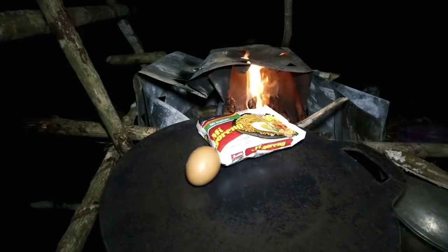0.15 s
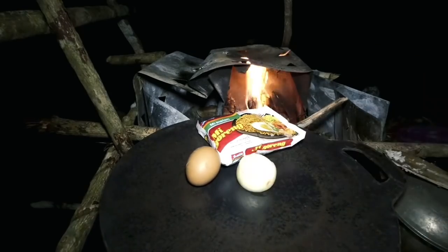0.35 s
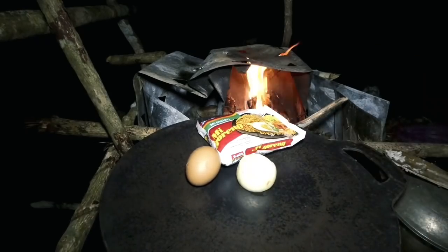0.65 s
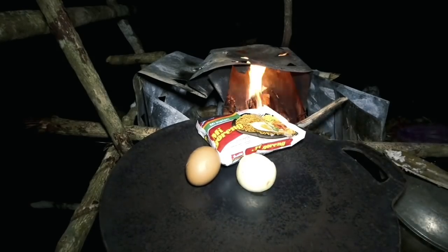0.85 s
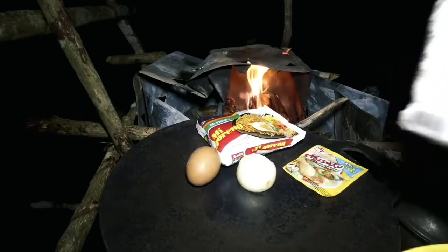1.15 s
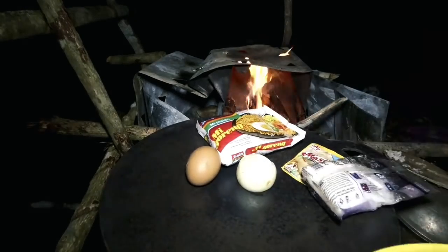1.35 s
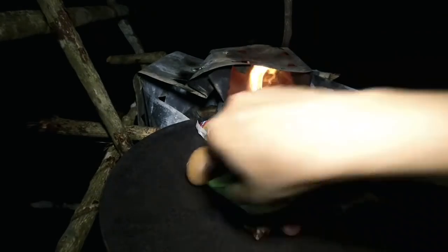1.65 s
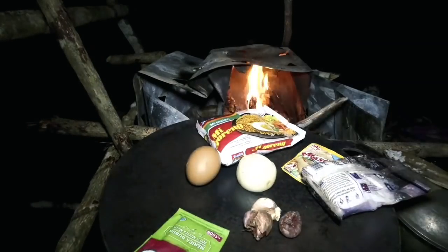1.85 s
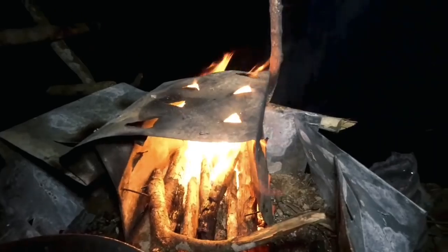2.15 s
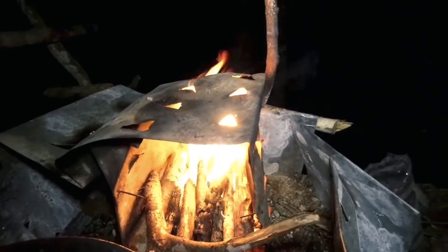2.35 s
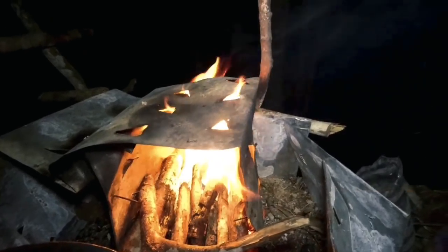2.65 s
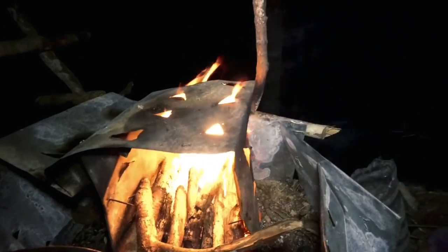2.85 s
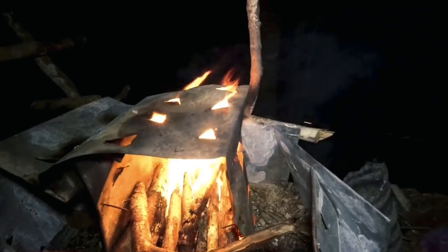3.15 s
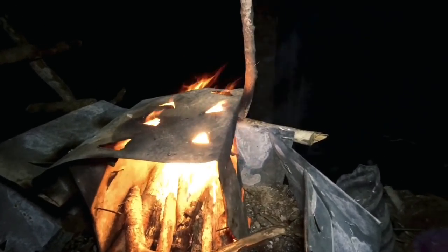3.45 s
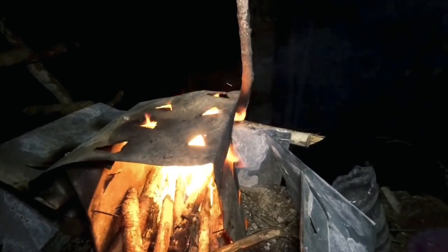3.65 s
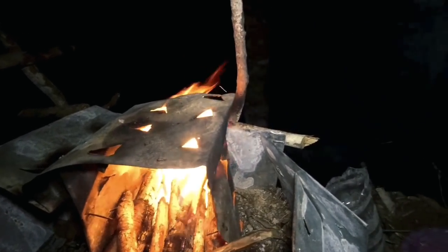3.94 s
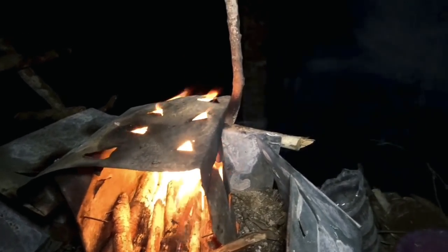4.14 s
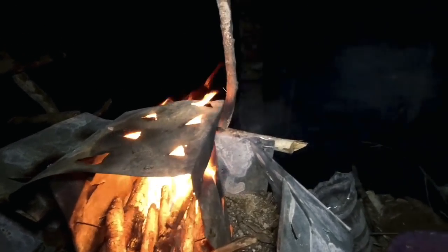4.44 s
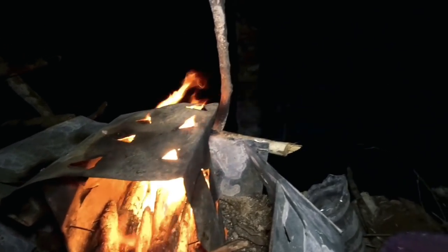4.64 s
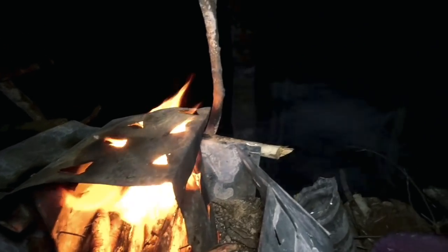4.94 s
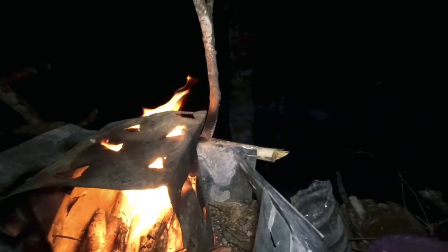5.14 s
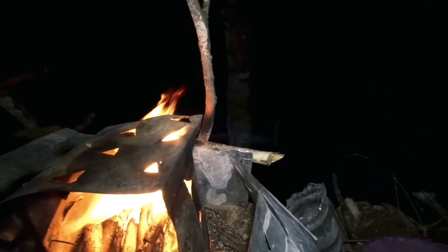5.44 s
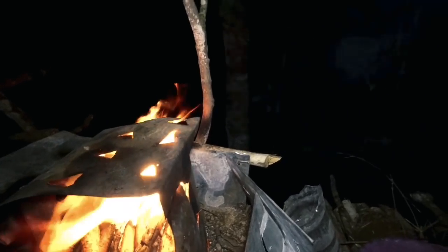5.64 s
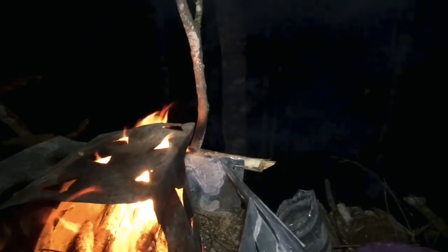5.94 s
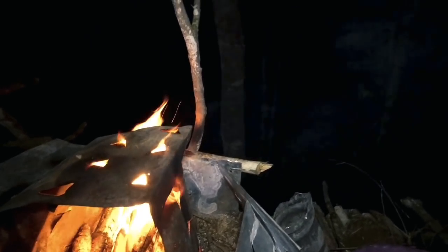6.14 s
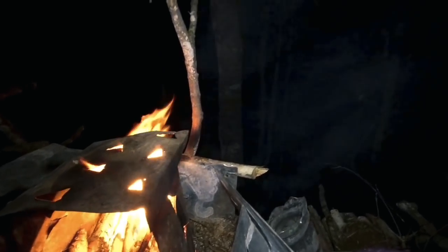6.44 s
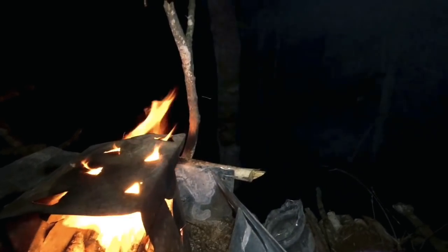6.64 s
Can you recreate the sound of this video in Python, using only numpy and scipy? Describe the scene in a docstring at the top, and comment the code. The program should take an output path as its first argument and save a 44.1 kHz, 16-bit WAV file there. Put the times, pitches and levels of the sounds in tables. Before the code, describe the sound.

A wide stereo night forest: a steady, shrill insect buzz near 5 kHz over fine hiss, with faint cricket trills, quacking frogs and tiny peeps. The fire is almost inaudible. At about two seconds it cuts abruptly and fades quickly into a close mono view, where low flame flutter, draught rumble, soft flaps and a small crack join the continuing insects, with sharp katydid ticks near the end.

```python
"""A night forest beside a small wood fire, heard in stereo from a step back, then in mono close by.
Buzzing insects are combs of tones near 5 kHz, over a flickering, patchy hiss of filtered noise.
Crickets are pulsed tones, frogs pulse trains or rising notes, and katydids ringing noise near 10 kHz.
The fire is random puffs, a low rumble, single flaps and cracks.
The first view stops short at 2.121 s and the close one fades in."""
import sys
import numpy as np
from scipy import signal
from scipy.fft import rfft, irfft, next_fast_len
from scipy.io import wavfile
from scipy.ndimage import uniform_filter1d, map_coordinates

SR = 44100
rng = np.random.default_rng(int(sys.argv[2]) if len(sys.argv) > 2 else 0)


def materialize(psi):
    """Save the field psi as 16-bit PCM at rate SR to the path in sys.argv[1].

    A 1-D psi becomes a single channel; in a 2-D psi each row is a channel.
    """
    bounded = np.clip(np.atleast_2d(psi).T, -1, 1)
    quanta = np.round(bounded * 32767).astype(np.int16)
    wavfile.write(sys.argv[1], SR, quanta)


N = 299439
T = np.arange(N) / SR  # time of every sample, in seconds

# Wing strokes of the buzzers, back from the fire and close to it: [time_s, strokes_per_s]
STROKE_RATE_BACK = [(0, 103.17), (1.4, 103.32), (2.1, 103.15)]
STROKE_RATE_CLOSE = [(2.2, 103.4), (2.7, 103.55), (3.2, 103.7), (3.8, 103.65), (4.4, 103.8), (5.2, 103.75),
                     (5.9, 103.45), (6.8, 103.5)]
# Base level of the buzzing, back from the fire: [time_s, level_db]
BUZZ_LEVEL_BACK = [(0, -37), (.3, -37.5), (.6, -35.5), (1.02, -38), (1.42, -36), (2.1, -35.5)]
# Base levels of the forest hiss and of the finer, higher hiss: [back_db, close_db]
AIR_LEVEL = [-54.5, -47]
FIZZ_LEVEL = [-62.5, -52.5]
# Strength of the flames, for both flutter and draught: [time_s, level_db]
FLAME_STRENGTH = [(0, -71.5), (2.1, -68.5), (2.2, -44.5), (2.62, -56), (3.02, -52), (3.35, -46), (3.7, -48),
                  (4.2, -44.5), (4.95, -51.5), (6.8, -54.5)]


def amp(db):
    """Turns decibels into a gain."""
    return 10 ** (np.asarray(db) / 20)


def unit(x):
    """Scales a sound to an rms of 1."""
    return x / np.sqrt(np.mean(x ** 2) + 1e-20)


def curve(rows):
    """Draws straight lines between the points of a time table, sample by sample."""
    rows = np.asarray(rows)
    return np.interp(T, rows[:, 0], rows[:, 1])


def gain_at(points, hz):
    """Reads the gain of a spectrum table between its points, on a log-frequency axis."""
    f, db = np.transpose(points)
    return amp(np.interp(np.log(hz + 1), np.log(f + 1), db))


def colour(x, points):
    """Filters a sound by a spectrum table."""
    size = next_fast_len(len(x))
    gain = gain_at(points, np.fft.rfftfreq(size, 1 / SR))
    return irfft(rfft(x, size) * gain, size)[:len(x)]


def wander(rate):
    """Smooth chance, rms near 1, with about `rate` new values a second."""
    knots = rng.standard_normal(4096)
    # smooth curve at every 64th sample, straight lines in between
    coarse = map_coordinates(knots, [np.arange(N // 64 + 2) * 64 / SR * rate], mode="wrap")
    steps = np.diff(coarse)[:, None] * np.arange(64) / 64
    return (coarse[:-1, None] + steps).ravel()[:N]


def resonate(x, hz, width):
    """A steep resonance: the same two poles applied twice."""
    r = np.exp(-np.pi * width / SR)
    b, a = [1 - r, 0, r - 1], [1, -2 * r * np.cos(2 * np.pi * hz / SR), r * r]
    return signal.lfilter(b, a, signal.lfilter(b, a, x))


def add(mix, s, sound):
    """Adds a sound to the mix at time s, cutting what falls outside."""
    start = round(s * SR)
    sound = sound[max(-start, 0):]
    part = mix[max(start, 0):][:len(sound)]
    part += sound[:len(part)]


def swell(length):
    """Time axis and rounded envelope of one call."""
    t = np.arange(int(max(length, .005) * SR)) / SR
    return t, np.sqrt(abs(np.sin(np.pi * t / t[-1])))


def run_of(start, calls, gap, slowing=0):
    """Times of a run of calls whose gaps lengthen steadily."""
    k = np.arange(round(calls))
    return start + gap * k + slowing * k * (k - 1) / 2


def forest(x, t60):
    """Scattered echoes from the trunks, dying by 60 dB in t60 seconds, total energy 1."""
    t = np.arange(SR // 2) / SR
    hits = rng.random(len(t)) < 2000 / SR  # about 2000 echoes a second
    taps = rng.standard_normal(len(t)) * hits * amp(-60 * t / t60)
    return signal.oaconvolve(x, taps / np.linalg.norm(taps))[:len(x)]


def wash(points, db, flicker_db, patchy_db):
    """A broad, flickering insect hiss with random soft and loud patches in pitch and time."""
    hz, t, z = signal.stft(rng.standard_normal(N), SR, nperseg=1024)
    patches = rng.standard_normal((len(t), len(hz))).T
    patches = uniform_filter1d(patches, size=4, axis=0)  # spread over pitch
    patches = unit(uniform_filter1d(patches, size=6, axis=1))  # spread over time
    z = z * gain_at(points, hz)[:, None] * amp(patchy_db * patches)
    hiss = signal.istft(z, SR, nperseg=1024)[1][:N]
    return amp(db) * unit(hiss * amp(flicker_db * wander(60)))


def buzzer(strokes, points, jitter, count=30):
    """Wing strokes ring near 5 kHz: a comb of tones at multiples of the stroke rate."""
    turns = np.cumsum(strokes * (1 + jitter * wander(25))) / SR
    order = np.arange(39, 39 + count)  # multiples that fall in the buzzing range
    lines = np.zeros(1025, complex)
    phases = np.exp(2j * np.pi * rng.random(count))
    lines[order] = gain_at(points, order * np.mean(strokes)) * phases
    stroke = irfft(lines)  # the waveform of one wing stroke
    return unit(np.interp(turns % 1, np.arange(len(stroke)) / len(stroke), stroke))


def crowd(points, others_db, blur_db, count=3):
    """A few farther buzzers at their own rates, swelling by turns, and the blur of all the rest."""
    swells = np.array([amp(2.6 * wander(3.02)) for _ in range(count)])
    swells /= np.linalg.norm(swells, axis=0)  # one rises as another sinks
    others = np.zeros(N)
    for share, rate in zip(swells, rng.uniform(101, 108, count)):
        strokes = rate * (1 + .001 * wander(1.5))
        others += share * buzzer(strokes, points, 0.000843)
    blur = unit(colour(rng.standard_normal(N), points))
    return amp(others_db) * others + amp(blur_db) * blur


def surround_back():
    """The insects all around, back from the fire; each call makes a fresh random version."""
    # spectrum of the farther buzzers: [pitch_hz, level_db]
    far_buzz = [(4000, -29), (4300, -4.5), (4600, 7), (4750, 5.5), (4900, 7.5), (5130, 11), (5300, -1.5),
                (5500, -3.5), (5800, -16), (6600, -29), (7200, -58)]
    # spectrum of the forest hiss, below and above the buzzing: [pitch_hz, level_db_per_hz]
    air = [(30, 0), (100, -4), (300, 4), (500, -1.5), (1000, -25), (1800, -2), (2400, -4), (3050, 6),
           (3300, 12), (3800, 18), (4100, 13), (5500, 14.5), (7500, 3), (9000, -25)]
    # spectrum of the finer, higher hiss: [pitch_hz, level_db]
    fizz = [(6000, -17.5), (7800, -5), (9000, 0.5), (10200, -1), (10900, 2.5), (11400, -46), (13500, -13),
            (14800, -2), (15600, -8)]
    insects = amp(curve(BUZZ_LEVEL_BACK)) * crowd(far_buzz, others_db=-4.5, blur_db=-5.5)
    air_hiss = wash(air, AIR_LEVEL[0] + 3.5, flicker_db=0.2, patchy_db=4.0)
    fizz_hiss = wash(fizz, FIZZ_LEVEL[0] + 3.0, flicker_db=1.1, patchy_db=1.5)
    return insects + air_hiss + fizz_hiss


def swelling_tones(gain_db=-1):
    """A few neighbouring tones of the near buzz swell out of the chorus and sink back."""
    # tones that stand out, levels before gain_db: [start_s, length_s, level_db, centre_hz, width_hz]
    tone_list = [(0.405, .38, -38.5, 5030, 65), (1.165, 0.2, -39, 4810, 120), (1.33, .16, -36.5, 5210, 100),
                 (1.66, 0.12, -40, 5220, 60), (1.756, 0.43, -34.5, 4710, 55), (2.798, 3.8, -45, 5450, 150),
                 (3.096, 1.35, -36.5, 4630, 190), (4.223, 0.24, -30.5, 5170, 70),
                 (4.999, 2, -45, 4870, 71.2), (5.638, 1.04, -40.5, 4490, 59.4),
                 (6.1, 0.99, -41.5, 5300, 69.6)]
    out = np.zeros(N)
    for s, length, db, hz, width in tone_list:
        f = np.linspace(3900, 7200, 200)
        band = np.transpose([f, -20 * np.log10(1 + ((f - hz) / width) ** 4)])
        arch = np.sqrt(abs(np.sin(np.pi * np.clip((T - s) / length, 0, 1))))
        tones = buzzer(curve(STROKE_RATE_BACK + STROKE_RATE_CLOSE), band, 0.000838)
        out += amp(db + gain_db + 1.7 * wander(8)) * arch * tones
    return out


def cricket(length, hz, pulse_rate, depth=0.37, waver_hz=27, uneven_db=2.5):
    """A nearly pure tone in uneven wing pulses, blurred by echoes."""
    size = round(length * SR)
    rate = pulse_rate * (1 + 0.337 * wander(14)[:size])
    pulses = 1 + depth * np.sin(2 * np.pi * np.cumsum(rate) / SR)
    pulses = pulses * amp(uneven_db * wander(21.8)[:size])
    pitch = hz + waver_hz * wander(160)[:size]
    tone = pulses * np.sin(2 * np.pi * np.cumsum(pitch) / SR)
    return unit(tone + forest(tone, t60=0.55))


def crickets(attack_s=0.019, release_s=0.017):
    """Each bout of trilling starts quickly, swells or sinks steadily and stops."""
    # bouts: [start_s, length_s, level_db at mid-bout, swell_db over the bout, pitch_hz, pulses_per_s]
    bouts = [(-.05, 0.96, -53, 3, 3256, 37), (0.751, 1.3, -60.5, 2, 3413, 19),
             (2.199, 3.6, -58, -3, 3370, 19), (2.348, 1, -62, 2, 3280, 25),
             (3.307, .44, -51.5, 11, 3206, 23), (3.74, 1.25, -50.5, 9, 3272, 26)]
    out = np.zeros(N)
    for s, length, db, swell_db, hz, pulse_rate in bouts:
        tone = cricket(length, hz, pulse_rate)
        t = np.arange(len(tone)) / SR
        gate = np.clip(np.minimum(t / attack_s, (length - t) / release_s), 0, 1)
        add(out, s, amp(db + swell_db * (t / length - .5)) * gate * tone)
    return out


def quacks(gain_db=-3.0, sag=0.063, jitter=0.0281, wet=0.98, count=10):
    """Rough, sagging pulse trains through a frog's throat, in runs that may slow, fade or grow."""
    # runs, levels before gain_db: [start_s, calls, first_gap_s, slowing_s per call, level_db,
    # fade_db per call (plus is louder), call_length_s, pitch_hz, throat_hz, roughness 0-1, chest_db]
    quack_runs = [(0.04, 5, 0.19, 0.0019, -53.5, 0, 0.049, 469, 1640, 0.65, -6.5),
                  (.062, 3, 0.18, 0.00046, -49, -2, 0.0944, 623.6, 1225, 0.34, -9),
                  (2.033, 2, 0.068, 0, -57.5, 4, 0.038, 398, 1720, 0.6, -12),
                  (2.368, 10, .142, .0061, -54, 0.2, 0.064, 317.5, 1600, 0.51, -16),
                  (4.852, 1, .19, 0, -58, 0, 0.079, 330, 1650, .45, -20),
                  (5.054, 5, .197, 0, -54.5, -1, 0.1003, 327.5, 1680, .45, -29),
                  (6.762, 1, .19, 0, -56, 0, 0.046, 333, 1750, .45, -27)]
    out, tremble = np.zeros(N), wander(170)
    for start, calls, gap, slowing, db, fade_db, length, pitch, throat, rough, chest_db in quack_runs:
        t, shape = swell(length)
        for call, s in enumerate(run_of(start, calls, gap, slowing)):
            bend = 1 + sag * (.5 - t / length) + jitter * np.interp(s + t, T, tremble)
            turns = np.cumsum(pitch * bend) / SR
            folds = unit(sum(np.cos(2 * np.pi * k * turns) for k in range(1, count)))
            drive = (1 - rough) * folds + 3.3 * rough * rng.standard_normal(len(t))
            voice = resonate(drive, throat, 426)
            voice = voice + 0.57 * resonate(drive, throat * 1.424, 440)
            voice = voice + amp(chest_db) * resonate(drive, throat * 0.44, 350)
            add(out, s, amp(db + gain_db + fade_db * call) * shape * unit(voice))
    return out + wet * forest(out, t60=0.45)


def peeps(length_s=0.0498, rise_hz=411, spread_db=0.7):
    """Small far frogs: short, rasping upward notes in even runs, each a little louder or softer."""
    # runs of peeps: [start_s, calls, gap_s, level_db, start_pitch_hz]
    peep_runs = [(.04, 13, .1655, -60.5, 2550), (2.512, 3, 0.27, -56, 2502), (2.662, 2, .28, -59.5, 1830),
                 (3.232, 10, .172, -59, 2437), (3.68, 5, 0.16, -72, 1930)]
    out = np.zeros(N)
    t, shape = swell(length_s)
    for start, calls, gap, db, start_hz in peep_runs:
        pitch = start_hz + rise_hz * t / length_s
        note = shape * np.sin(2 * np.pi * np.cumsum(pitch) / SR)
        for s in run_of(start, calls, gap):
            rasp = unit(uniform_filter1d(rng.standard_normal(len(t)), 170))
            level = amp(db + spread_db * rng.standard_normal())
            add(out, s, level * unit(note * (.5 + rasp)))
    return out + .9 * forest(out, t60=.25)


def squawks(rasp_rate=170):
    """Harsh squawks: rasping puffs of noise through three throat resonances."""
    # single squawks: [start_s, level_db, length_s, lowest_resonance_db (added), echo_db]
    squawk_list = [(5.01, -48, 0.083, -7.5, 1), (6.604, -40, 0.067, -0.5, -7.5)]
    # throat resonances, lowest first: [pitch_hz, width_hz, level_db]
    throat = [(1795, 220, -2), (2350, 630, -6.5), (2700, 490, 3)]
    out = np.zeros(N)
    for s, db, length, low_db, echo_db in squawk_list:
        t, shape = swell(length)
        puffs = rng.standard_normal(len(t)) * (1 + 0.23 * np.sin(2 * np.pi * rasp_rate * t))
        voice = np.zeros(len(t))
        for k, (hz, width, mode_db) in enumerate(throat):
            gain = amp(mode_db + low_db * (k == 0))
            voice += (-1) ** k * gain * unit(resonate(puffs, hz, width))
        call = np.pad(shape * unit(voice), (0, SR // 2))  # room for the echoes
        add(out, s, amp(db) * (call + amp(echo_db) * forest(call, t60=0.48)))
    return out


def scrape(length, hz, width, tooth_rate=130):
    """A file scraped in quick strokes rings a small wing resonance."""
    t, shape = swell(length)
    teeth = rng.standard_normal(len(t)) * (1 + 0.13 * np.sin(2 * np.pi * tooth_rate * t))
    return shape * unit(resonate(teeth, hz, width))


def katydids(wet=0.74):
    """Scraped wings give short chirps, thin whines and broad rasps, with echoes."""
    # chirps: [start_s, level_db, pitch_hz]
    chirp_list = [(.036, -60, 10600), (1.143, -62, 10700), (1.27, -62, 10570), (1.383, -60, 10600),
                  (1.637, -56, 10600), (1.74, -55.5, 10700), (2.755, -51, 10500), (3.04, -48, 10670),
                  (4.52, -46, 10560), (4.956, -37.5, 10570), (5.22, -49.5, 10770), (5.338, -47, 10860),
                  (5.578, -52, 10800), (5.779, -46, 10480), (5.914, -42, 10830), (5.946, -46, 10830),
                  (6.16, -45, 10780), (6.447, -49.5, 10550), (6.549, -40, 10660), (6.67, -47, 10700)]
    # thin insect whines: [start_s, level_db, length_s, pitch_hz, width_hz]
    whine_list = [(1.496, -64.5, 0.71, 10070, 48), (4.08, -51, 0.11, 6700, 156.5),
                  (5.787, -48.5, 0.14, 9800, 48)]
    # brief, very high rasps: [start_s, level_db]
    rasp_list = [(.3, -51.5), (1.448, -51), (3.85, -58), (5.55, -57.5)]
    out = np.zeros(N)
    for s, db, hz in chirp_list:
        add(out, s, amp(db) * scrape(length=0.041, hz=hz, width=270))
    for s, db, length, hz, width in whine_list:
        add(out, s, amp(db) * scrape(length, hz, width))
    for s, db in rasp_list:
        add(out, s, amp(db) * scrape(length=0.088, hz=14100, width=3900))
    return out + wet * forest(out, t60=0.28)


def draught(level_db=-1, surge_db=2.5):
    """Air drawn into the fire rumbles with the flames and swells in gusts."""
    # gusts: [start_s, length_s, level_db]
    gust_list = [(2.26, .08, -43), (5.104, 0.24, -40), (5.441, 0.096, -35.5), (5.63, 0.2, -45),
                 (5.88, .42, -35.5), (6.33, .08, -43), (6.483, .08, -45.5)]
    # spectrum of the rumble: [pitch_hz, level_db]
    rumble = [(10, 0.5), (22, -7), (35, -3), (55, -3), (80, -13), (130, -33), (300, -78)]
    # level_db is relative to the flame strength
    strength = amp(curve(FLAME_STRENGTH) + level_db + surge_db * wander(7.9))
    for s, length, db in gust_list:
        add(strength, s, amp(db) * swell(length)[1])
    return strength * unit(colour(rng.standard_normal(N), rumble))


def fire(puff_rate=150, spread_db=2.5, surge_db=2.5, flap_hz=210, flap_s=0.0018, crack_s=0.0053):
    """Small puffs of burning gas over a draught rumble, with single flaps and wood cracks."""
    # spectrum of the flutter: [pitch_hz, level_db]
    flame = [(24, -40), (40, -21), (65, 1), (118, 1), (152, -1), (247, -2.5), (374, -10), (419, -20),
             (490, -32), (660, -23), (1200, -32), (1560, -55), (2640, -120)]
    # single flaps of flame, loudest moment just under the level: [time_s, level_db]
    flap_list = [(1.498, -42.5), (2.289, -32.5), (2.775, -29), (3.222, -30.5), (3.47, -29), (3.481, -26.5),
                 (3.584, -32.5), (4.157, -22), (4.173, -26), (4.27, -26), (4.305, -26.5), (4.467, -29),
                 (4.68, -28.5)]
    # cracks of burning wood: [time_s, peak_db]
    crack_list = [(2.329, -29.5), (5.584, -43)]
    # spectrum of a crack: [pitch_hz, level_db]
    crack_colour = [(200, -20), (800, 1), (3000, 7), (6000, -10), (14000, -2)]
    sizes = amp(spread_db * np.minimum(rng.exponential(1, N), 3))
    fires_now = rng.random(N) < puff_rate / SR  # puff_rate puffs a second on average
    puffs = rng.standard_normal(N) * sizes * fires_now
    flutter = unit(colour(unit(puffs) + 0.48 * rng.standard_normal(N), flame))
    out = amp(curve(FLAME_STRENGTH) + surge_db * wander(16)) * flutter + draught()
    t = np.arange(-SR // 50, SR // 50) / SR  # 20 ms either side of the event
    for s, db in flap_list:
        fall = np.exp(-np.hypot(t, flap_s / 10) / flap_s)
        add(out, s + t[0], -amp(db) * np.cos(2 * np.pi * flap_hz * t) * fall)
    for s, db in crack_list:
        burst = rng.standard_normal(len(t)) * np.exp(-abs(t) / crack_s) * (t > 0)
        snap = colour(burst, crack_colour)
        add(out, s + t[0], amp(db) * snap / abs(snap).max())
    return out


def back_from_fire(calls, near_db=3.5, lag_share=0.64, around_share=1.0, echo_share=0.3):
    """Stereo: single sources lead in phase on the left; the surround differs between the sides."""
    # spectrum of the nearest buzzer: [pitch_hz, level_db]
    near_buzz = [(4000, -46), (4233, -21), (4336, -8), (4440, 1.5), (4543, -3), (4646, 2.5), (4750, -10),
                 (4853, 5), (4956, -12), (5059, -12.5), (5162, -7.5), (5266, -8.5), (5600, -29),
                 (6500, -31), (7000, -43)]
    # stereo width, before the two shares: [pitch_hz, side_over_mid_db]
    width = [(60, -7), (110, -4), (200, -14), (380, -14), (700, -3.5), (1290, -3.5), (2380, 4), (4400, 1),
             (8120, -1), (15000, -1)]
    strokes = curve(STROKE_RATE_BACK)
    near = buzzer(strokes, near_buzz, jitter=0.00062)
    for _ in range(2):  # shifting echoes lift and lower each line in turn
        near = near + echo_share * wander(4.43) * buzzer(strokes, near_buzz, jitter=0.00061)
    direct = calls + amp(curve(BUZZ_LEVEL_BACK) + near_db) * unit(near)
    mid = direct + surround_back()
    quarter_turn = signal.hilbert(direct, next_fast_len(N))[:N].imag  # each tone a quarter cycle late
    side = colour(around_share * surround_back() - lag_share * quarter_turn, width)
    return np.array([mid + side, mid - side])


def beside_fire(calls, near_db=-2.0):
    """Mono: a near buzzer of wandering level among the crowd, with a stronger far hiss."""
    # spectra of the nearest and the farther buzzers: [pitch_hz, level_db]
    near_buzz = [(4000, -25), (4250, -7.5), (4350, -10), (4460, -5), (4560, -5), (4770, 3), (4980, 4),
                 (5080, -4), (5190, -8), (5295, -3.5), (5500, -6), (5710, -12), (6500, -33), (7000, -42)]
    far_buzz = [(4000, -40.5), (4300, -15), (4480, -3), (4620, 4.5), (4850, 4), (5150, 6), (5330, 1.5),
                (5500, -12.5), (5750, -22), (6600, -22), (7200, -31)]
    # base level of the buzzing: [time_s, level_db]
    buzz_level = [(2.3, -37), (3.7, -37), (6.8, -35.5)]
    # spectrum of the forest hiss: [pitch_hz, level_db_per_hz]
    air = [(30, -17), (300, -10), (600, -9.5), (1050, -15), (1600, -7), (2300, -7.5), (3050, 0), (3350, 6),
           (3780, 16), (4100, 4), (5500, 10), (7000, 3), (8000, -4), (9000, -28)]
    # spectrum of the finer, higher hiss: [pitch_hz, level_db]
    fizz = [(6000, -24.5), (7800, -5.5), (8700, 0.5), (9600, 1), (10800, -1.5), (11500, -17.5),
            (13000, -22), (14100, -8), (14900, -2.5), (15600, -3.5)]
    near = buzzer(curve(STROKE_RATE_CLOSE), near_buzz, jitter=0.001126)
    near = amp(near_db + wander(1.81)) * near
    insects = amp(curve(buzz_level)) * (near + crowd(far_buzz, others_db=-1.0, blur_db=-1.5))
    air_hiss = wash(air, AIR_LEVEL[1] + 2.5, flicker_db=0.9, patchy_db=3.0)
    fizz_hiss = wash(fizz, FIZZ_LEVEL[1] + 5, flicker_db=0.0, patchy_db=1.5)
    return calls + insects + air_hiss + fizz_hiss


def scene(cut_s=2.121, cut_length_s=0.0057):
    """The sound from further back is cut off and the sound beside the fire fades in."""
    # fade-in of the sound close to the fire: [time_s, level_db]
    fade_in = [(2.121, -36), (2.175, -26), (2.21, -17), (2.25, -9), (2.29, -1.5), (2.33, 0.5)]
    calls = swelling_tones() + crickets() + quacks() + peeps() + squawks() + katydids() + fire()
    first = np.clip((cut_s - T) / cut_length_s, 0, 1)
    close = amp(curve(fade_in)) * beside_fire(calls)
    return first * back_from_fire(calls) + (1 - first) * close


def record(dry):
    """A steep low-pass filter takes away what lies above about 15.6 kHz."""
    low_pass = signal.firwin(511, 15600, window=("kaiser", 9), fs=SR)
    return signal.oaconvolve(dry, low_pass[None], "same")


dry = scene()
out = record(dry)
materialize(out)
```